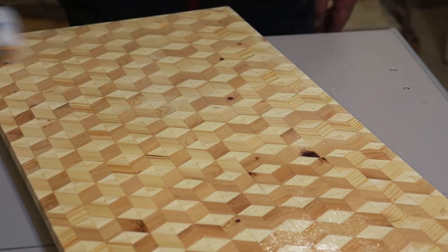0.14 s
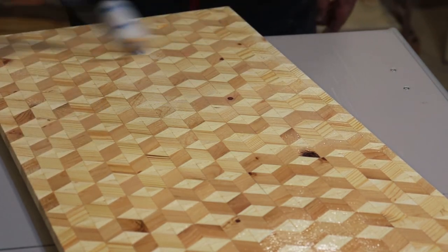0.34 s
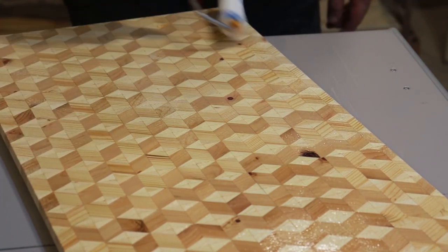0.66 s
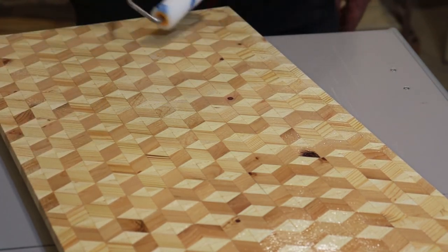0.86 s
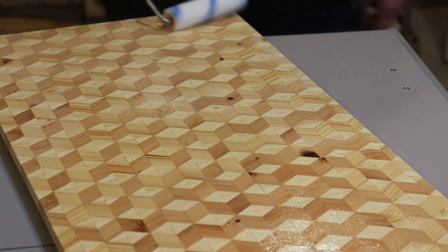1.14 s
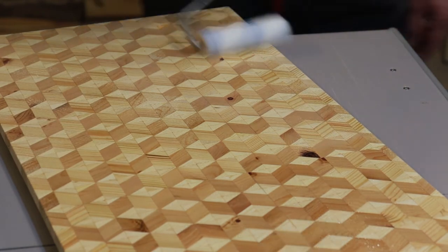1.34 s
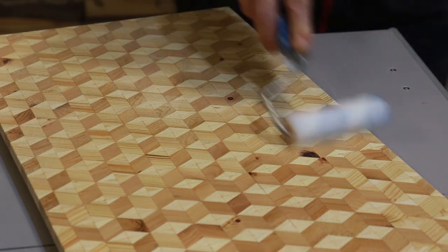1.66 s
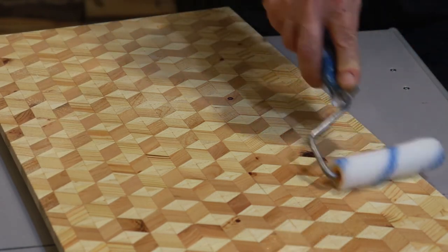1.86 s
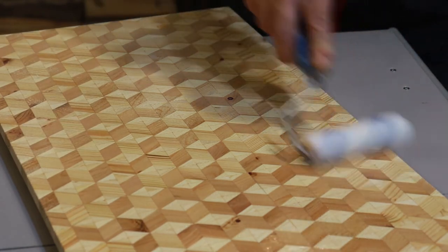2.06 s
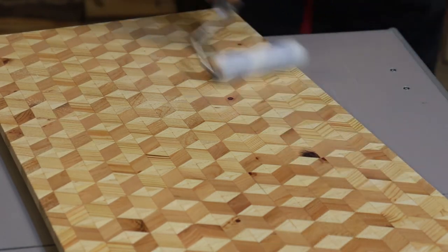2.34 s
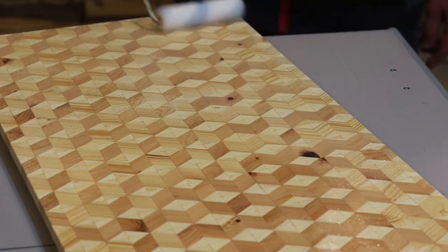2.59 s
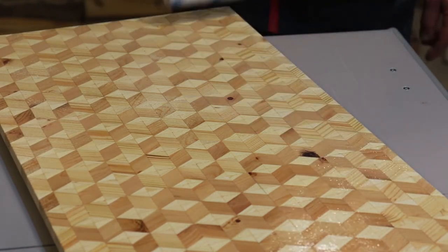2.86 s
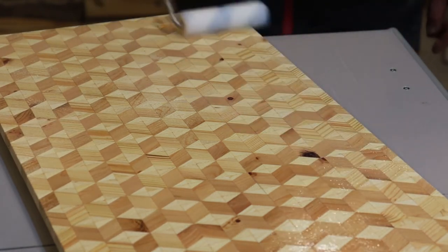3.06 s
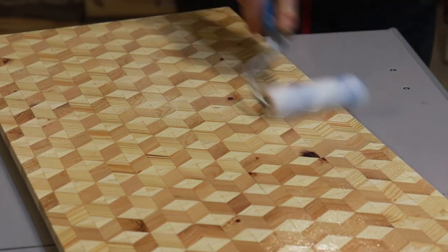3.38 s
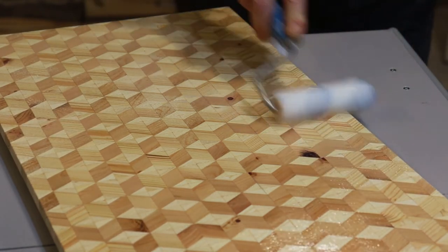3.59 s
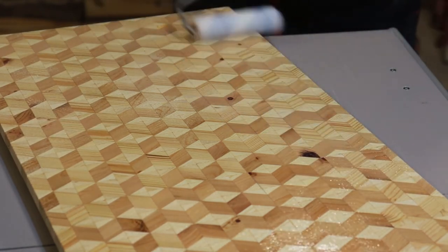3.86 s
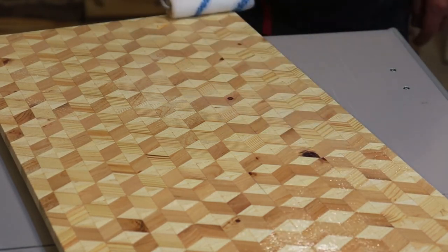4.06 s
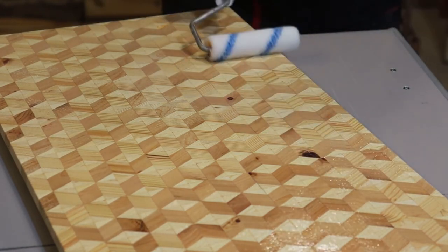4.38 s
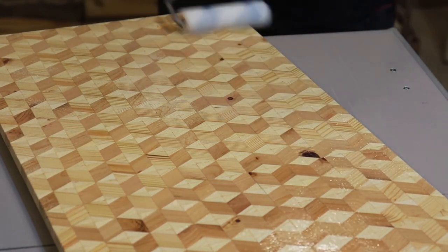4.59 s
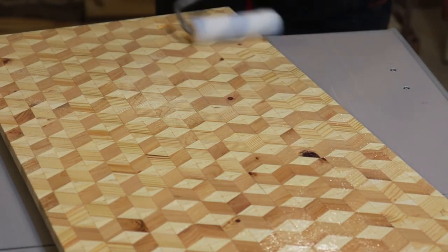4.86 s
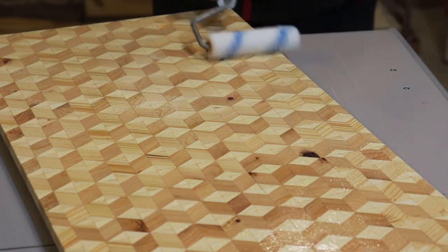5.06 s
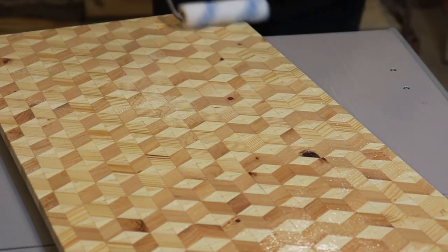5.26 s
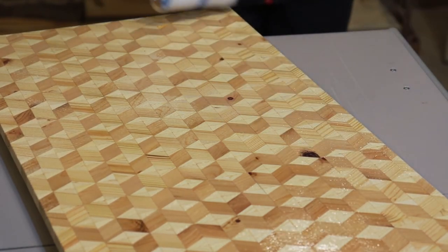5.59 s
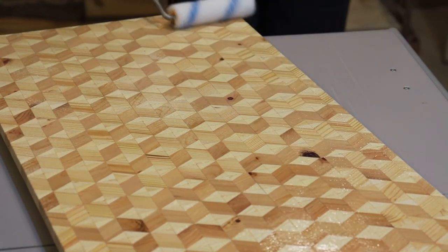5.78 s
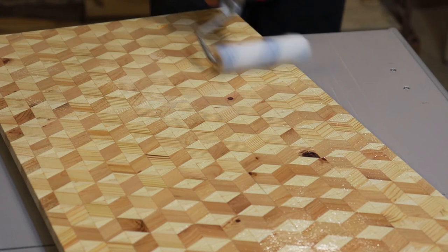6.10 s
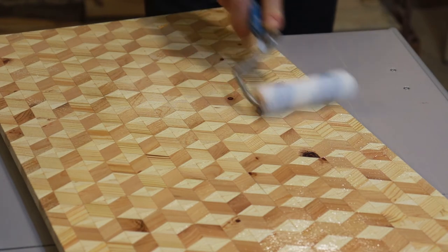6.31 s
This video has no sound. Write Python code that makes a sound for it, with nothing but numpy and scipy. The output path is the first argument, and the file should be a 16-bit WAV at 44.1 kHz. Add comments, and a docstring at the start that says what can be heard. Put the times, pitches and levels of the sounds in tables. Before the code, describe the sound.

Over the steady low hum of a workshop fan, a small roller spreads wet finish on wood in repeated soft, tacky swishes, starting on the right and moving nearer the middle. The loose sleeve ticks and rattles irregularly against its metal frame while the board drones faintly underneath. In the second half come a few dull bumps and three quick, soft knocks as the roller comes down, then more rolling.

```python
"""A fan hums in a workshop while a small paint roller spreads wet finish over a droning wooden board.
From the start, mostly on the right, threads of finish snap behind the roller (fizz), its fuzzy nap
rubs the wood (swish) and its sleeve rattles faintly. Near 1 s comes a faint, breath-like hiss, and the
sleeve starts to tick on its wire frame. From 3 s the board now and then bumps on its table. Just before
5 s the roller lands with three soft knocks, then rolls on, by now nearer the middle."""
import sys
import numpy as np
from scipy import signal
from scipy.fft import rfft, irfft
from scipy.io import wavfile

SR = 44100
rng = np.random.default_rng(int(sys.argv[2]) if len(sys.argv) > 2 else 0)


def to_wav(sig):
    """Store sig (one row per channel, or 1-D mono) as 16-bit WAV at the path in sys.argv[1].

    Samples outside -1..1 are clipped; the rate is SR.
    """
    pcm = np.clip(np.atleast_2d(sig), -1, 1) * 32767
    pcm = np.round(pcm).astype(np.int16)
    wavfile.write(sys.argv[1], SR, pcm.T)  # frames by channels


N = 284004
TIME = np.arange(N) / SR
BINS = np.fft.rfftfreq(N, 1 / SR)  # the pitches in a spectrum, in Hz

# A level_db compares the rows of its table. A fade_s is the time a sound takes to fall by 60 dB.
# the fan's rush of air: pitch_hz, level_db
AIR_SPECTRUM = [(15, -36), (30, -23.5), (75, -14), (120, -12.5), (175, 2.5), (260, -4), (340, -5.5),
                (375, -9), (430, -12), (480, -12.5), (750, -14), (990, -18), (1300, -24), (2800, -38),
                (7000, -48), (15000, -49)]
# the fan's one brief lull: time_s, air_db, tones_db
FAN_LEVELS = [(4.1, -35, 0), (4.4, -36.5, -3), (4.9, -34, -0.5)]
# the fan's tones: pitch_hz, level_db, waver_hz, shake_ratio (shaken part over steady part)
FAN_TONES = [(90, -57.5, 5.8, 2.4), (137.4, -45.5, 7, 2.6), (192.7, -41.5, 4.3, 1.15),
             (202.1, -44, 4.2, 2.1), (248.5, -47, 6, 1.2), (291, -55, 2, 2.2), (311.9, -48, 2.5, 0.85),
             (336.7, -49, 2.5, 1), (394.2, -51, 5.4, 1.8), (403.3, -45, 3.4, 1), (493, -55.5, 3.8, 1.7),
             (570.5, -54, 4.5, 0.96), (860, -59, 3.6, 0.33), (938, -56.5, 5.6, 1.1)]
# how alike the air sounds in the two ears: pitch_hz, likeness_0_to_1
EAR_LIKENESS = [(60, 0.96), (300, 0.95), (640, 0.77), (1400, 0.34), (3000, 0.021), (15000, 0.031)]
# roller strokes, with relative levels at full speed: start_s, end_s, fizz_db, swish_db, drone_db
STROKES = [(-.2, 0.173, -38, -26.5, -42.5), (0.16, 0.441, -41, -30.5, -39),
           (0.416, 0.741, -38.5, -29.5, -64), (0.59, 1.484, -61.5, -48.5, -42),
           (1.307, 2.09, -48.5, -46.5, -47), (2.052, 2.828, -46.5, -44, -42.5),
           (3.1, 3.653, -47.5, -43.5, -50), (3.621, 4.215, -47.5, -44, -39.5),
           (4.225, 4.556, -52.5, -48, -42.5), (4.526, 4.845, -50, -48, -50),
           (4.849, 5.094, -54, -47.5, -37), (5.013, 5.672, -46, -39.5, -41), (5.652, 5.769, -63, -46, -40),
           (5.766, 6.138, -60, -46.5, -40), (5.98, 6.916, -51, -50, -37)]
# where the roller is: time_s, left_ear_delay_ms, left_minus_right_db, sideways_slide_0_to_1
ROLLER_PATH = [(0, 0.25, -7, 1), (.7, 0.12, -5, 0.9), (.85, 0.097, -7, 0.1), (1.3, 0, -4, 0.2),
               (6.4, 0.044, -2, 0.06)]
# threads of finish snapping: pitch_hz, level_db
FIZZ_SPECTRUM = [(700, -73), (1500, -6.5), (3500, 1.5), (6000, 2.5), (9500, 0.5), (13500, 0.5),
                 (16000, -0.5)]
# the nap rubbing as it rolls: pitch_hz, level_db
SWISH_SPECTRUM = [(300, -29), (900, -2.5), (1700, -3.5), (2400, -3.5), (3700, -6), (4900, -8), (6300, -14),
                  (8000, -20), (15000, -73)]
# the nap sliding sideways: pitch_hz, level_db
SLIDE_SPECTRUM = [(400, -35), (900, -9.5), (1600, -4), (2400, -4.5), (3800, -4.5), (5200, -9),
                  (7500, -11.5), (10000, -22), (15000, -30)]
# the board's drone under the roller: pitch_hz, level_db
DRONE_SPECTRUM = [(15, -40), (30, -25), (70, -8), (130, 10), (300, 8.5), (500, -1), (750, -4.5),
                  (1100, -15.5), (2000, -34)]
# the workshop's first echoes: delay_s, left_gain, right_gain
ECHOES = [(.0054, 0.18, 0.18), (.0072, -0.12, 0.09), (0.013, .11, 0.085)]
# how long the workshop rings: pitch_hz, fade_s
ROOM_FADE = [(250, 0.18), (1000, 0.42), (4000, 0.42), (14000, 0.23)]
# the bright click of the sleeve's end cap: pitch_hz, level_db
CAP_SPECTRUM = [(500, -21), (1500, -13.5), (2300, -18), (2900, -3), (3350, -4), (4080, 3), (4850, -5.5),
                (5450, -3.5), (6000, -11), (7000, -19), (9000, -27), (15000, -32)]
# the clack of the sleeve's hollow core: pitch_hz, level_db
CORE_SPECTRUM = [(200, -22), (600, -1), (1200, -5.5), (1680, 1.5), (2200, -5.5), (3200, -8), (5000, -15),
                 (8000, -32), (15000, -45)]
# skids of the nap: start_s, level_db, pitch_hz, half_width_octaves, rise_s, fade_s
SKIDS = [(.436, -40.5, 2906, 0.96, 0.034, 0.73), (1.88, -47.5, 1560, 0.66, 0.013, 0.28),
         (1.945, -52.5, 2300, 1, 0.021, 0.19), (2.092, -65, 9000, 1.04, 0.004, 0.47),
         (2.46, -55, 1400, 1.0, 0.026, 0.66), (3.04, -52, 4230, 0.55, 0.006, 0.22),
         (3.515, -46, 1620, 0.93, 0.028, 0.23), (5.42, -47, 1070, 0.98, 0.0087, 0.42),
         (5.68, -56, 1800, 0.22, 0.015, 0.38), (5.845, -54.5, 3480, 0.82, 0.0096, 0.17),
         (6.3, -50.5, 950, 0.86, 0.011, 0.25)]
# a faint, thin, breath-like hiss: start_s, end_s, level_db
SOFT_HISS = [(.86, 1.42, -50)]
# the tone colour of that hiss: pitch_hz, level_db
SOFT_HISS_SPECTRUM = [(1500, -27), (2100, -3), (2800, -2), (3300, -7), (4700, 0), (5700, -7), (6800, -18),
                      (10000, -30), (15000, -54.5)]
# ticks of the sleeve on its frame: start_s, click_db, clack_db, bounce_db, wire_hz, wire_db, room_db
TICKS = [(1.2122, -15.5, -33, -7, 1044, -34.5, -2.5), (1.574, -43, -43, -10, 1033, -37.5, -9),
         (1.6455, -51, -49, -5, 1044, -39, -3), (1.725, -45, -43, -10, 1025, -41, -6),
         (2.343, -25, -23, -8, 1019, -33.5, -7), (2.489, -39, -34, -12, 986, -36, -4),
         (2.803, -29, -26.5, -14, 1095, -45, -0.5), (2.902, -35.5, -42, -15, 985, -52, -5),
         (3.0455, -17.5, -19.5, -5, 958, -37.5, 0), (3.3605, -31, -25, -12, 972, -31, -5),
         (3.47, -31, -24.5, -8, 996, -41, 2), (3.7018, -46, -27, -10, 1040, -45, 3),
         (3.7668, -6, -11.5, -11, 975, -28, -4.5), (3.8023, -19, -31, -6, 983, -35, -6),
         (3.8738, -19, -24, -19.5, 1030, -46, -3), (3.886, -25, -18, -15, 1002, -29, -3),
         (3.999, -43, -34, -10.5, 994, -43, -7), (5.2299, -14.5, -12.5, -12, 1020, -42.5, -3)]
# bumps of the board: start_s, level_db, pitch_hz, half_width_octaves, rise_s, fade_s
BUMPS = [(3.06, -30, 68, 1.37, 0.043, 0.85), (3.19, -37, 55, 1.5, 0.036, 0.38),
         (3.72, -38.5, 85.6, 0.55, 0.018, 0.34), (3.93, -43, 370, 0.36, 0.044, 0.9),
         (4.868, -37, 520, 0.55, 0.026, 0.45), (4.93, -37, 370, 0.65, 0.03, 0.65),
         (4.95, -37.5, 74, 0.97, 0.035, 0.98), (5.07, -42, 72, 0.4, .03, 0.62),
         (5.72, -37, 130, 0.43, 0.11, 2.4), (6.32, -35, 275, 0.6, 0.11, 0.8)]
# the roller landing on the board: start_s, level_db
LANDINGS = [(4.874, -28), (4.891, -21.5), (4.928, -27)]
# the notes of the knocked board: pitch_hz, level_db, fade_s
WOOD_NOTES = [(335, -9, 0.18), (437, -5, 0.12), (505, 1, 0.11), (580, -6, 0.078), (680, -11, .1),
              (805, -10, .1)]

FIZZ_POWER, SWISH_POWER, DRONE_POWER = 0.95, 0.68, 0.2  # each sound grows as speed to this power
FIZZ_REST_DB, SWISH_REST_DB, DRONE_REST_DB = -79, -57.5, -50  # what stays between strokes
WIRE_HZ, WIRE_HALF_WIDTH_HZ = 1004, 150  # where the wire frame rings


def amp(db):
    """Turns decibels into a number to multiply by."""
    return 10 ** (np.asarray(db) / 20)


def unit(x):
    """Scales a signal to an average strength (rms) of 1."""
    return x / np.sqrt(np.mean(x ** 2) + 1e-20)


def curves(rows):
    """Turns each column of a timed table into a value for every sample."""
    times, *columns = np.transpose(rows)
    return [np.interp(TIME, times, column) for column in columns]


def read(points, hz):
    """Looks up a table at any pitch, joining its points on a log scale."""
    pitches, values = np.transpose(points)
    return np.interp(np.log(hz + 1), np.log(pitches + 1), values)


def colour(x, db):
    """Turns each pitch in x up or down by db, then scales to strength 1."""
    return unit(irfft(rfft(x) * amp(db), N))


def waver(hz):
    """A slow random wobble, with up to about hz changes a second."""
    return unit(irfft(rfft(rng.standard_normal(N)) * np.exp(-(BINS / hz) ** 2), N))


def add(mix, start_s, sound):
    """Lays a sound into the mix."""
    part = mix[..., round(start_s * SR):][..., :sound.shape[-1]]
    part += sound[..., :part.shape[-1]]


def snaps(per_s, spread_db):
    """Tiny clicks at random times; spread_db sets how much their sizes differ."""
    size = amp(spread_db * np.minimum(rng.exponential(1, N), 4))
    return size * rng.choice([-1, 1], N) * (rng.random(N) < per_s / SR)


def bursts(rows):
    """Short swells of noise, each around one pitch."""
    out = np.zeros(N)
    for start_s, db, hz, octaves, rise_s, fade_s in rows:
        age = np.maximum(TIME - start_s, 0)
        noise = colour(rng.standard_normal(N), -4.3 * (np.log2((BINS + 1) / hz) / octaves) ** 2)
        out += noise * np.minimum(age / rise_s, 1) * amp(db - 60 * np.maximum(age - rise_s, 0) / fade_s)
    return out


def fan_tone(hz, waver_hz, shake_ratio):
    """One tone of the fan: a steady part, and a part that the churning air shakes about."""
    shake = (waver(waver_hz) + 1j * waver(waver_hz)) * np.sqrt(.5)
    steady = np.exp(2j * np.pi * (hz * TIME + rng.random()))
    return unit(((1 + shake_ratio * shake) * steady).real)


def fan():
    """The fan makes a low rush of air, alike in both ears in the bass, with wavering tones in it."""
    common, apart = rfft(rng.standard_normal((2, N)))
    likeness = np.clip(read(EAR_LIKENESS, BINS), 0, 1)
    mid, side = common * np.sqrt(1 + likeness), apart * np.sqrt(1 - likeness)
    air_db, tones_db = curves(FAN_LEVELS)
    air = colour(irfft([mid + side, mid - side], N), read(AIR_SPECTRUM, BINS)) * amp(air_db)
    hum = sum(amp(db) * fan_tone(hz, waver_hz, shake) for hz, db, waver_hz, shake in FAN_TONES)
    return (air + hum * amp(tones_db)) * amp([[-1], [.8]])  # left ear, right ear


def arches(rows, power, rest_db):
    """A level in dB that rises and falls once for each row."""
    energy = np.full(N, amp(2 * rest_db))
    for start, end, db in rows:
        progress = np.clip((TIME - start) / (end - start), 0, 1)
        active = (progress > 0) & (progress < 1)
        arch = np.sin(np.pi * progress[active] ** 0.84)  # highest a little before the middle
        energy[active] += (amp(db) * arch ** power) ** 2
    return 10 * np.log10(energy)


def stroke_levels():
    """Fizz, swish and drone levels in dB: they follow the hand as it speeds up and slows down."""
    start, end, fizz, swish, drone = np.transpose(STROKES)
    return (arches(zip(start, end, fizz), FIZZ_POWER, FIZZ_REST_DB),
            arches(zip(start, end, swish), SWISH_POWER, SWISH_REST_DB),
            arches(zip(start, end, drone), DRONE_POWER, DRONE_REST_DB))


def nap(fizz_db, swish_db, sliding, snaps_per_s, spread_db):
    """Threads of finish snap, fibres rub and skid on the wood, and the wire frame sings faintly."""
    fizz = colour(snaps(snaps_per_s, spread_db), read(FIZZ_SPECTRUM, BINS)) * amp(fizz_db)
    fibres = snaps(per_s=9000, spread_db=2.5)
    roll = (1 - sliding) * colour(fibres, read(SWISH_SPECTRUM, BINS))
    slide = sliding * colour(fibres, read(SLIDE_SPECTRUM, BINS)) * amp(-1)
    wire_spectrum = -20 * np.log10(1 + ((BINS - WIRE_HZ) / WIRE_HALF_WIDTH_HZ) ** 2)
    wire_db = np.minimum(fizz_db, -48) - 9.5  # follows the fizz, up to a limit
    wire = colour(rng.standard_normal(N), wire_spectrum) * amp(wire_db)
    return fizz + (roll + slide) * amp(swish_db) + wire + skids()


def linger(db, fade_s):
    """The room holds on to a level, so it dies away instead of stopping."""
    keep, power = amp(-120 / (fade_s * SR)), amp(2 * db)
    return 10 * np.log10(signal.lfilter([1 - keep], [1, -keep], power, zi=[power[0]])[0])


def roller():
    """The nap is heard straight from where the roller is, and as a wash of echoes from the room."""
    fizz_db, swish_db, _ = stroke_levels()
    delay_ms, side_db, sliding = curves(ROLLER_PATH)
    patchy_db = 1.2 * waver(hz=30)  # the nap is wetter in some places than in others
    fizz_db, swish_db = fizz_db - 1.5 + patchy_db, swish_db - 6.5 + patchy_db
    right = nap(fizz_db, swish_db, sliding, snaps_per_s=6000, spread_db=-0.5)
    fine = signal.resample_poly(right, 4, 1)  # finer time steps allow a tiny delay
    left = np.interp(TIME - delay_ms / 1000, np.arange(4 * N) / (4 * SR), fine)
    # countless snaps, each with its own echoes, reach the two ears differently
    held_db = linger(fizz_db, fade_s=0.11), linger(swish_db, fade_s=0.28)
    wash = np.array([nap(*held_db, sliding, snaps_per_s=25000, spread_db=5.5) for ear in "LR"])
    return (np.array([left, right]) + amp(3.5) * wash) * amp(np.array([side_db, -side_db]) / 2)


def drone():
    """The board drones as the roller runs over it."""
    _, _, drone_db = stroke_levels()
    return colour(rng.standard_normal(N), read(DRONE_SPECTRUM, BINS)) * amp(drone_db)


def workshop(x, tail_db, build_s):
    """The room sends back a few quick echoes and a tail that lasts longest at middle pitches."""
    t = np.arange(SR // 3) / SR
    hz, age, bands = signal.stft(rng.standard_normal((2, len(t))), SR, nperseg=256)
    bands *= amp(-60 * age / read(ROOM_FADE, hz)[:, None])
    echo = signal.istft(bands, SR, nperseg=256)[1][:, :len(t)]
    echo *= 1 - np.exp(-(t / build_s) ** 2)
    echo *= amp(tail_db) / np.linalg.norm(echo, axis=1, keepdims=True)
    for delay_s, left, right in ECHOES:
        echo[:, round(delay_s * SR)] += left, right
    return signal.fftconvolve(x[None], echo, axes=1)[:, :len(x)]


def board_in_room(wood):
    """The board's low notes go straight to both ears; those above 300 Hz also scatter round the room."""
    scattered = signal.sosfilt(signal.butter(2, 300, "high", fs=SR, output="sos"), wood)
    return (wood + workshop(scattered, tail_db=-8.5, build_s=0.0094)) * amp([[-1], [.8]])


def click(click_db, clack_db, size=2048, swing_s=0.0007):
    """One sharp tap passes through the sleeve's cap and core, which stop ringing almost at once."""
    hz = abs(np.fft.fftfreq(size, 1 / SR))
    cap, core = amp(read(CAP_SPECTRUM, hz)), amp(read(CORE_SPECTRUM, hz))
    gain = np.hypot(amp(click_db) * cap / cap.mean(), amp(clack_db) * core / core.mean())
    spectrum = np.exp(np.conj(signal.hilbert(np.log(gain))))  # nothing sounds before the tap
    delay_s = swing_s * cap / cap.max()  # the cap's strongest notes take longest to swing up
    spectrum *= np.exp(-2j * np.pi * np.cumsum(delay_s) * SR / size)
    return irfft(spectrum[:size // 2 + 1], size)


def knock(click_db, clack_db, bounce_db, wire_hz, wire_db):
    """The loose sleeve hits its frame: it clicks, chatters and bounces, and the wire rings on."""
    t = np.arange(SR // 3) / SR
    # the bent wire has two close notes that beat against each other
    wire = np.sin(2 * np.pi * wire_hz * t) - amp(-14) * np.sin(2 * np.pi * (wire_hz + 55) * t)
    tick = wire * amp(wire_db - 60 * t / 0.135)
    contact = click(click_db, clack_db)
    add(tick, 0, contact)
    add(tick, 0.00074, amp(-12) * contact)  # chatter
    add(tick, 0.0046, amp(bounce_db) * contact)
    return tick


def rattle(top_knocks_per_s=28, full_speed_db=-47.5):
    """The frame knocks faintly at random, more often the faster the sleeve turns."""
    fizz_db, _, _ = stroke_levels()
    speed = np.minimum(amp(fizz_db - full_speed_db), 1)  # louder fizz stands for more speed
    out = np.zeros(N)
    for at in np.flatnonzero(rng.random(N) < top_knocks_per_s * speed / SR):
        force_db, detune = rng.uniform(-4, 4), rng.normal(1, .025)
        tap_db = force_db - 44
        tick = knock(tap_db, tap_db, bounce_db=-7, wire_hz=WIRE_HZ * detune, wire_db=force_db - 51.5)
        add(out, at / SR, tick)
    return (out + workshop(out, tail_db=0, build_s=0.0016)) * amp([[-1.5], [1.5]])


def skids():
    """The nap skids as the roller lands, drags or turns round."""
    return bursts(SKIDS) * amp(4.5)


def soft_hiss():
    """A faint, thin, breath-like hiss swells and fades, off to the right."""
    spectrum = read(SOFT_HISS_SPECTRUM, BINS)
    hiss = np.array([colour(snaps(per_s=6200, spread_db=4), spectrum) for ear in "LR"])
    return hiss * amp(arches(SOFT_HISS, power=0.68, rest_db=-100)) * amp([[-2.5], [2.5]])


def ticks():
    """The sleeve's louder knocks on its frame, each with its own echoes."""
    out = np.zeros((2, N))
    for start_s, *blow, room_db in TICKS:
        tick = knock(*blow)
        add(out, start_s, tick + workshop(tick, tail_db=room_db, build_s=0.0039))
    return out * amp([[-1.5], [1.5]])


def bumps():
    """The board thuds dully on its table when it is pushed."""
    return bursts(BUMPS)


def landings(rise_s=0.0059):
    """The padded roller comes down softly, and the board rings with a few dying notes."""
    t = np.arange(SR // 3) / SR
    ring = sum((-1) ** k * amp(db - 60 * t / fade_s) * np.sin(2 * np.pi * hz * t)
               for k, (hz, db, fade_s) in enumerate(WOOD_NOTES))  # neighbours swing opposite ways
    ring *= 1 - np.exp(-t / rise_s)
    ring /= abs(ring).max()
    out = np.zeros(N)
    for start_s, db in LANDINGS:
        add(out, start_s, amp(db) * ring)
    return out


def scene():
    """The fan, with the roller, the board, the frame and a soft hiss on top."""
    out = fan() + roller() + board_in_room(drone() + bumps() + landings())
    return out + rattle() + soft_hiss() + ticks()


def record(dry):
    """Cuts away the very highest treble, above 15780 Hz."""
    low_pass = signal.firwin(1023, 15780, window=("kaiser", 9), fs=SR)
    return signal.oaconvolve(dry, low_pass[None], "same")


dry = scene()
out = record(dry)
to_wav(out)
```